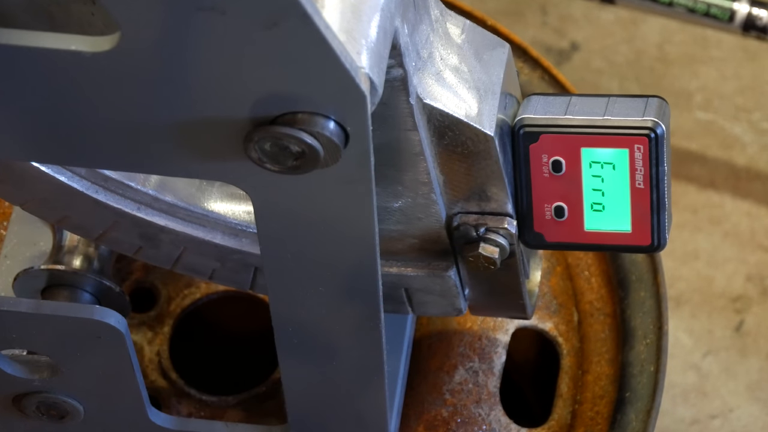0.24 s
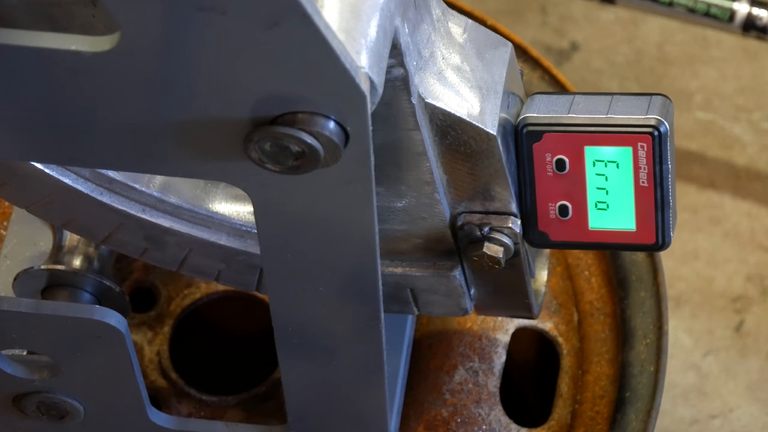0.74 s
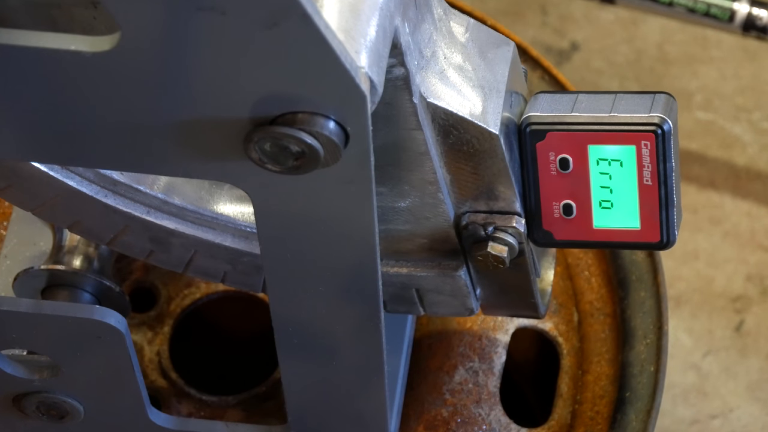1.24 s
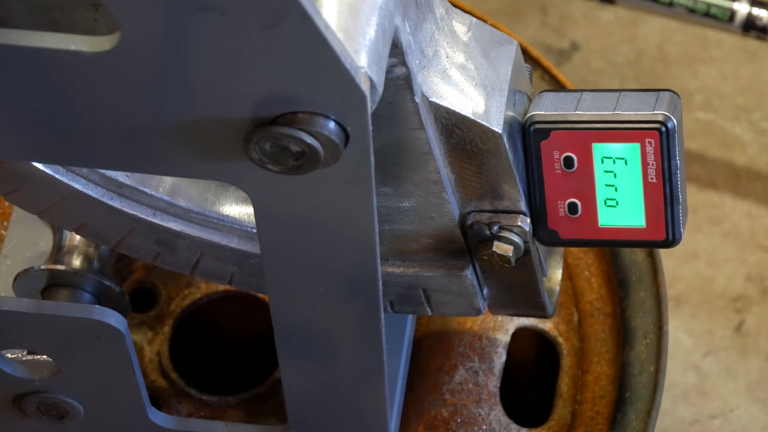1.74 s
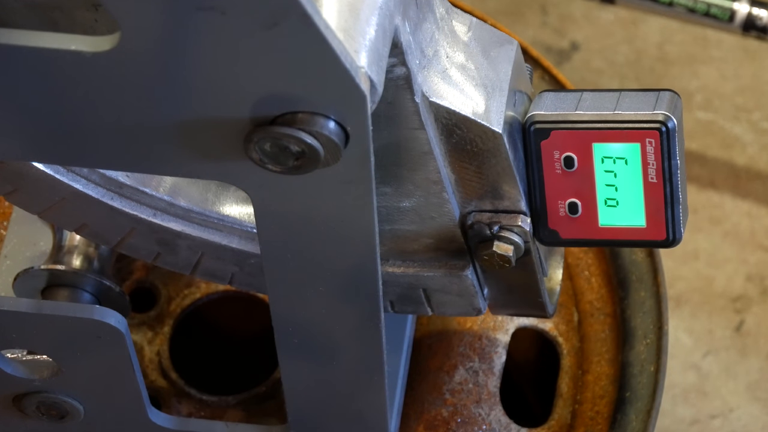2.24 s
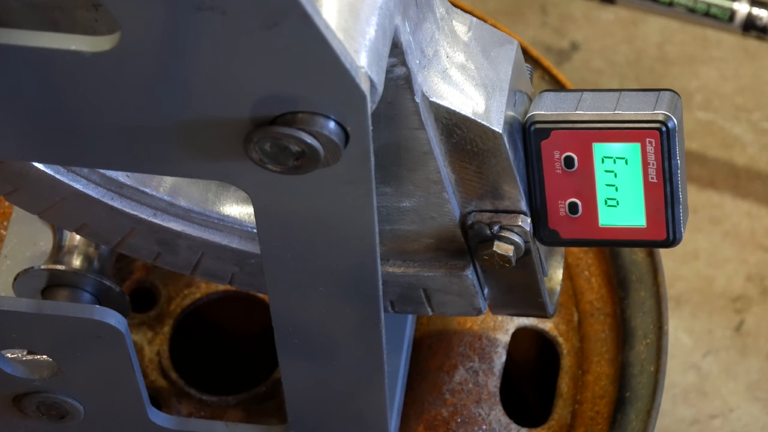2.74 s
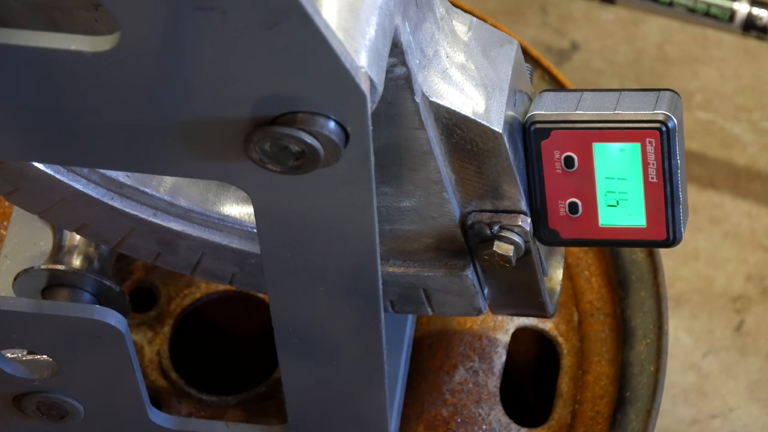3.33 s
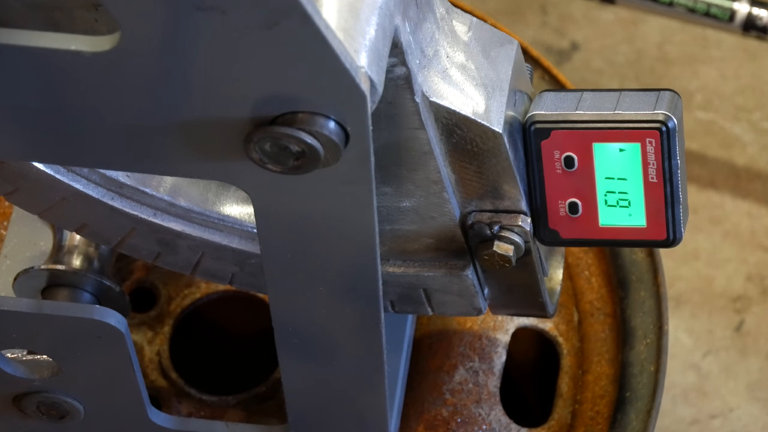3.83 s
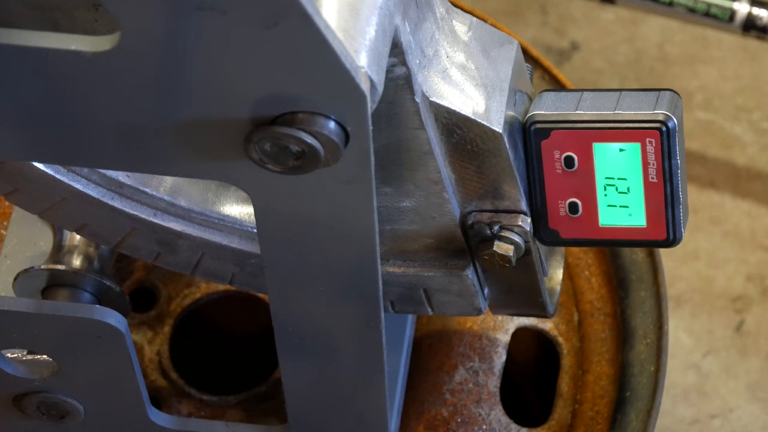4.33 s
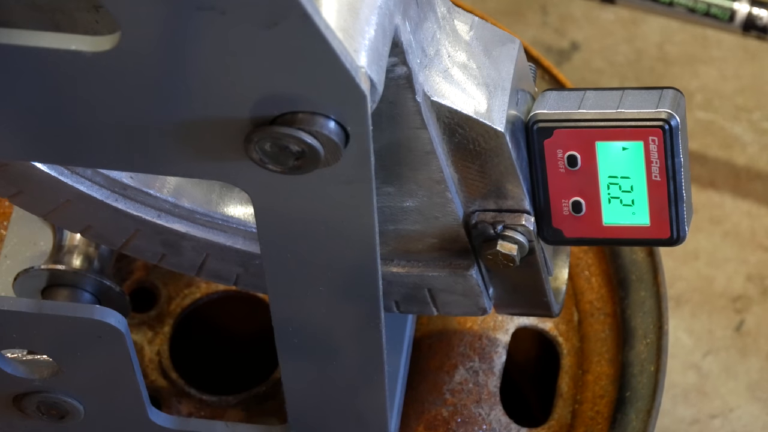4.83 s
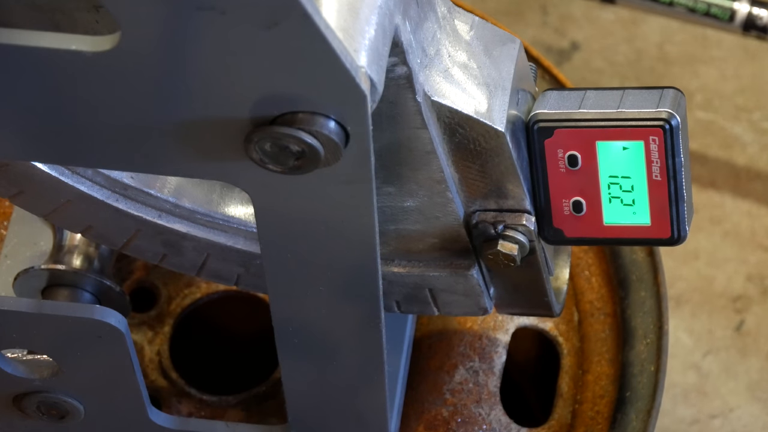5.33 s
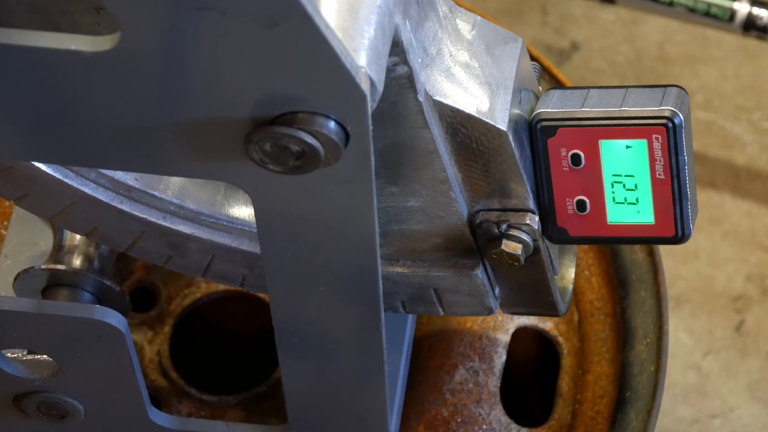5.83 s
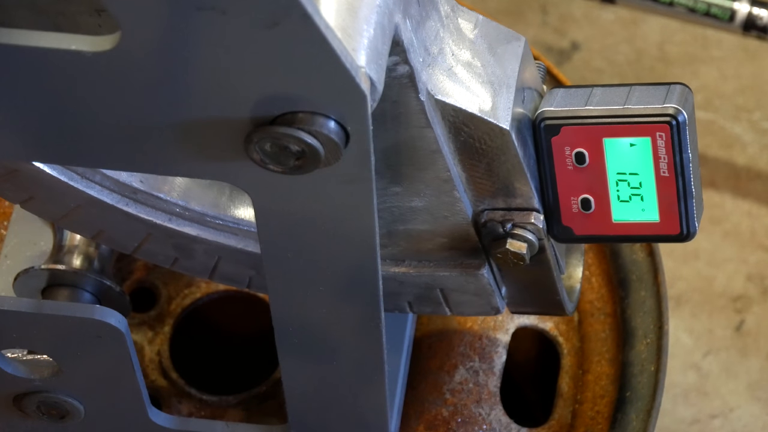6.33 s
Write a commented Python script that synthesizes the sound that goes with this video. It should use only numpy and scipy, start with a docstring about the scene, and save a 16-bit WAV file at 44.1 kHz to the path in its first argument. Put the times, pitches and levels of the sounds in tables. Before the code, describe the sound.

Close metallic clacks of a hand-pumped jack handle, three quick pump strokes, a near-silent pause of over two seconds, then slower strokes.

```python
"""A small workshop: a hydraulic jack on a steel tube bender is pumped by hand, with a pause half way.
Each push slams the loose handle home in its socket, each lift knocks and scrapes it back: filtered
contact pulses, stick-slip clicks and decaying modes. Link pins chink (noise ticks), the frame thuds.
A low gliding drone swells briefly over a faint rough hum and soft noise; the sound is close and nearly mono."""
import sys
import numpy as np
from scipy import signal
from scipy.fft import rfft, irfft
from scipy.io import wavfile

SR = 44100
rng = np.random.default_rng(int(sys.argv[2]) if len(sys.argv) > 2 else 0)


def to_wav(s):
    """Save 16-bit WAV."""
    ch = np.atleast_2d(s).T  # columns
    pcm = np.round(np.clip(ch, -1, 1) * 32767)  # PCM
    wavfile.write(sys.argv[1], SR, pcm.astype(np.int16))


N = 290178
LEAD_SAMPLES = SR // 4  # run-in, cut off in scene()
SLACK_RING_DB = -17.5  # handle ring while it slides through its play

# spectrum of a pin shifting in its hole: f/Hz, relative level/dB
PIN_SPECTRUM = [(500, -28.5), (3000, -12.5), (5000, -5), (8000, -11), (10200, -5), (11600, -1), (12800, 1),
                (14000, -9.5), (16000, -15)]


def undb(db):
    """Decibels to gain."""
    return 10 ** (np.asarray(db) / 20)


def unit(x):
    """Scale to an energy of one."""
    return x / np.sqrt(np.sum(x ** 2))


def along(table, hz):
    """Read a (f/Hz, value) table on a log-frequency axis."""
    f, value = np.transpose(table)
    return np.interp(np.log(np.maximum(hz, 1)), np.log(f), value)


def noise(t):
    """White noise as long as t."""
    return rng.standard_normal(len(t))


def fade(t, t60):
    """Exponential decay, 60 dB in t60 seconds."""
    return np.exp(-np.log(1000) * t / t60)


def walk(t, rate):
    """Smooth random drift with a spread near one: rate random points per unit of t, joined by lines."""
    points = rng.standard_normal(1024)
    return np.interp(t * rate, np.arange(len(points)), points)


def tap(spectrum, size=1024):
    """Minimum-phase pulse of unit energy with this spectrum, by folding the cepstrum."""
    log_gain = np.log(undb(along(spectrum, np.fft.rfftfreq(size, 1 / SR))))
    cepstrum = irfft(log_gain)
    cepstrum[1:size // 2] *= 2
    cepstrum[size // 2 + 1:] = 0
    return unit(irfft(np.exp(rfft(cepstrum))))


def through(x, response):
    """Filter x, keeping its length."""
    return signal.fftconvolve(x, response)[:len(x)]


def ring(modes, t, scatter_db=0.5, detune=0.0023):
    """Decaying modes; every blow lands elsewhere and shares them out anew."""
    chance = rng.standard_normal((len(modes), 2))
    total = np.zeros(len(t))
    for (hz, db, t60), (level_chance, pitch_chance) in zip(modes, chance):
        tone = np.sin(2 * np.pi * hz * (1 + detune * pitch_chance) * t)
        total += undb(db + scatter_db * level_chance) * fade(t, t60) * tone
    return unit(total)


def add(track, s, sound):
    """Mix in a sound at s seconds; the track begins LEAD_SAMPLES early."""
    start = LEAD_SAMPLES + int(s * SR)
    part = sound[:len(track) - start]
    track[start:start + len(part)] += part


def pump():
    """All the sounds of the pump strokes, close up, heard through the plates."""
    # pushes, timed by the knock that seats the handle: t/s, knock/dB, socket ring/dB, change per rebound/dB,
    # chink lead/s, chink/dB, first tap lead/s, tap/dB, share of upper frame modes/dB
    pushes = [(-.05, 8, -15.5, -16, 0.076, -6.5, 0.021, -4, 4.5),
              (0.4927, 6, -27, -6.5, 0.042, -23.5, 0.024, -8, 3),
              (1.0264, 4.5, -39, -4, 0.049, -8.5, 0.029, -8.5, -3),
              (4.8094, 6.5, -17, -7, 0.041, -16, 0.022, -11, -5.5),
              (5.5699, 5.5, -30, -7.5, 0.041, -20.5, 0.015, -13.5, -15.5),
              (6.2945, 5, -40, -8, 0.037, -11.5, .018, -11, -11)]
    # lifts, timed by the knock on the far side of the socket: t/s, knock/dB, treble setting/dB, touch lead/s,
    # touch/dB, scrape length/s, scrape/dB, handle ring/dB, chink delay/s, chink/dB, link ring/dB,
    # settling knock/dB, thud/dB, share of upper frame modes/dB
    lifts = [(0.2319, -2, -6.5, .027, -41.5, 0.018, -34.5, 0.5, 0.01, -20.5, -1, -3.5, -20.5, 0),
             (0.757, -2.5, -2.5, .019, -25, 0.022, -36, -1, .013, -17, -1, -12, -22, 0),
             (1.2735, -17, 6.5, 0.025, -20.5, 0.03, -37.5, -8, 0.014, -17, -0.5, -5, -24.5, 3.5),
             (3.951, -10.5, -30.5, .0072, -14.5, 0.041, -39.5, 6, 0.011, -18.5, 6.5, -15, -22, -3.5),
             (4.404, -13, -12, .019, -20.5, .036, -50, -1.5, .0255, -10.5, -20, -15.5, -24, 9.5),
             (5.148, -15, -8.5, 0.016, -18, 0.02, -42.5, -22, 0.009, -29.5, 7, -34, -20.5, -8),
             (5.929, -24, 3.5, .021, -16.5, 0.017, -41.5, -13, 0.015, -36, 6.5, -18.5, -22.5, -2.5)]
    track = np.zeros(LEAD_SAMPLES + N)
    t = np.arange(SR // 2) / SR
    gestures = [push(t, *row) for row in pushes] + [lift(t, *row) for row in lifts] + [rest(t)]
    for gesture in gestures:
        for s, sound in gesture:
            add(track, s, sound)
    return through(track, plates())


def push(t, s, db, socket_db, rebound_db, chink_lead_s, chink_db, tap_lead_s, tap_db, upper_db):
    """Down stroke as (s, sound): pins grind and chink, handle slides, taps twice, slams, rebounds; frame thuds."""
    slack_s, rebound_s = 0.05, 0.004  # slide through the play before seating; rebound spacing
    yield s - slack_s, undb(-42) * slide(t, slack_s, SLACK_RING_DB)
    yield s - slack_s, undb(-18.5) * grind(t)
    yield s - chink_lead_s, undb(chink_db) * chink(t, link_db=1)
    for lead_s in (tap_lead_s, tap_lead_s * 0.71):
        yield s - lead_s, knock(t, tap_db, treble_db=-20.5, socket_db=-7.5)
    for k in range(3):
        yield s + k * rebound_s, knock(t, db + k * rebound_db, treble_db=-23, socket_db=socket_db)
    yield s, undb(-18) * thud(t, frame_db=3.5, upper_db=upper_db)


def lift(t, s, db, treble_db, touch_lead_s, touch_db, scrape_s, scrape_db, handle_db,
         chink_delay_s, chink_db, link_db, settle_db, thud_db, upper_db):
    """Up stroke as (s, sound): handle slips, touches, grazes, knocks, scrapes and settles with a thud."""
    slack_s, slack_growth = .038, 2.6  # harder lifts rasp more in the play: dB per dB of the knock
    yield s - slack_s, undb(-41.5 + slack_growth * db) * slide(t, slack_s, SLACK_RING_DB)
    yield s - touch_lead_s, knock(t, touch_db, treble_db=-29.5, socket_db=-6)
    # the handle grazes on from the first touch
    yield s - touch_lead_s, undb(touch_db - 25) * slide(t, touch_lead_s, handle_db)
    yield s, knock(t, db, treble_db, socket_db=-12)
    yield s, undb(scrape_db) * slide(t, scrape_s, handle_db)
    yield s + chink_delay_s, undb(chink_db) * chink(t, link_db)
    yield s + scrape_s, knock(t, settle_db, treble_db=-13.5, socket_db=-12.5)
    # the frame rings more when the load bears on its upper modes
    frame_db = 2 + 0.83 * upper_db
    yield s + scrape_s, undb(thud_db) * thud(t, frame_db, upper_db)


def rest(t, socket_db=-14, handle_db=-18):
    """Resting handle as (s, sound): light ticks, shifts by the hand, and one soft thud under the load."""
    # light ticks of the handle: t/s, level/dB, treble setting/dB
    ticks = [(3.3473, -42, -12), (4.349, -33.5, -20)]
    # the hand shifts the handle: t/s, length/s, level/dB
    shifts = [(1.913, .012, -73), (2.4, .46, -85.5), (3.637, 0.17, -79.5)]
    for s, db, treble_db in ticks:
        yield s, knock(t, db, treble_db, socket_db)
    for s, length_s, db in shifts:
        yield s, undb(db) * slide(t, length_s, handle_db)
    yield 2, undb(-37) * thud(t, frame_db=-1.5, upper_db=-3.5)


def knock(t, force_db, treble_db, socket_db):
    """Steel on steel: one compact contact, a short chatter of the loose fit, socket and rim ring."""
    # contact spectrum: f/Hz, relative level/dB
    contact_spectrum = [(150, -46), (700, -31), (1100, -22), (1650, -11.5), (2300, -16.5), (3000, -7),
                        (3450, 2), (3950, -1), (4600, -18), (6000, -24), (7500, -29), (10000, -36.5),
                        (12600, -37.5), (16000, -48)]
    # socket modes: f/Hz, relative level/dB, t60/s
    socket_modes = [(1670, -7, 0.076), (1835, -14, 0.68), (2760, -15, 0.41), (3080, -4.5, 0.19),
                    (3320, -3, 0.37), (3790, -0.5, 0.19), (3750, 4.5, .28), (3780, -4.5, 0.3),
                    (4050, -2.5, .25), (4200, -12, .26), (7220, -21, .12), (12480, -19.5, .1)]
    # socket rim modes: f/Hz, relative level/dB, t60/s
    rim_modes = [(4410, -2, .04), (5480, 0.5, 0.037), (5980, -3.5, 0.059), (7700, -11.5, .035)]
    # sharper contacts lift everything above the socket's main resonance and set its rim ringing
    treble_lift_db = .75 * (treble_db + 26.5)
    spectrum = [(hz, db + treble_lift_db * (hz > 4300)) for hz, db in contact_spectrum]
    rim_db = np.interp(treble_db, [-25, -8], [-26, -4])
    rim = undb(rim_db) * ring(rim_modes, t, scatter_db=8.5, detune=.015)
    chatter = unit(noise(t) * fade(t, 0.055) * (1 - fade(t, 0.002)))
    # a hard blow seats the handle at once, a light one lets it rattle
    chatter_db = np.interp(force_db, [-14.5, 5.5], [-1, -9])
    blow = signal.unit_impulse(len(t)) + undb(chatter_db) * chatter
    contact = disperse(through(blow, spot(spectrum)))
    return undb(force_db) * (contact + rim + undb(socket_db) * ring(socket_modes, t))


def slide(t, length_s, handle_db):
    """Stick and slip: dense uneven clicks; the handle's ring builds up as long as they last."""
    # rub spectrum: f/Hz, relative level/dB
    rub_spectrum = [(150, 3.5), (700, -6), (1700, 0.5), (2400, 4.5), (3400, 8), (4600, -5), (5700, -9),
                    (7500, -14), (12000, -16.5), (16000, -22.5)]
    # handle modes: f/Hz, relative level/dB, t60/s
    handle_modes = [(1893, -15, .26), (3120, -4.5, 0.61), (3105, -0.5, 0.22), (3080, -1, 0.12),
                    (5410, -12.5, 0.18), (7280, -23, .1)]
    after_s = np.maximum(t - length_s, 0)
    pressure = (1 - fade(t, 0.11)) * fade(after_s, 0.11)
    rasp = np.zeros(len(t))
    for _ in range(3):  # points of the handle that rub at once
        clicks = (rng.random(len(t)) < 380 / SR) * noise(t)  # about 380 per second
        rasp += through(clicks * pressure, spot(rub_spectrum))
    # the ring falls back as the handle comes to rest in the socket
    swell = np.minimum(t / length_s, 1) ** .5 * (1 + 3.2 * fade(after_s, 0.066))
    singing = unit(swell * ring(handle_modes, t))
    return (unit(rasp) + undb(handle_db) * singing) * np.sqrt(length_s * SR)


def chink(t, link_db):
    """A pin shifts in its hole: a bright tick and the ring of the small link."""
    # link modes: f/Hz, relative level/dB, t60/s
    link_modes = [(6330, 0.5, 0.18), (9080, -14.5, 0.21), (11170, 4, 0.073), (11563, -4, 0.17),
                  (12050, -6, 0.021)]
    contact = noise(t) * fade(t, .009) * (1 - fade(t, .008)) ** 2
    tick = unit(through(contact, spot(PIN_SPECTRUM)))
    return tick + undb(link_db) * ring(link_modes, t) * (1 - fade(t, .015))


def grind(t):
    """The pins turn in their holes: a bright rub that swells softly and dies away."""
    rub = noise(t) * fade(t, .13) * (1 - fade(t, .06)) ** 2
    return unit(through(rub, spot(PIN_SPECTRUM)))


def thud(t, frame_db, upper_db):
    """The heavy frame rocks: a soft push and its low modes, shared out by where the load bears."""
    # spectrum of the push: f/Hz, relative level/dB
    thud_spectrum = [(40, -50), (100, -20.5), (150, 4), (300, -6.5), (420, 1), (600, -9.5), (1200, -13.5),
                     (4000, -47)]
    # frame modes: f/Hz, relative level/dB, t60/s
    frame_modes = [(132, -15.5, 0.16), (190, -21, 0.24), (228.3, -1.5, 0.38), (268, 8, 0.24),
                   (361, 2.5, 0.46), (472, -12, .3)]
    swell = noise(t) * fade(t, 0.21) * (1 - fade(t, 0.038))
    soft_push = unit(through(swell, tap(thud_spectrum)))
    modes = [(hz, db + upper_db * (hz > 300), t60) for hz, db, t60 in frame_modes]
    return soft_push + undb(frame_db) * ring(modes, t)


def spot(spectrum):
    """Pulse of one contact: each lands on another spot, which colours its treble differently."""
    hz = np.linspace(100, SR / 2, 220)
    ripple_db = np.interp(hz, [3000, 6000], [1, 4]) * walk(hz, 1 / 420)  # a random point every 420 Hz
    return tap(np.column_stack([hz, along(spectrum, hz) + ripple_db]))


def disperse(x, hz=3700, sharpness=2.5):
    """All-pass: the socket holds back waves near its resonance, so a contact swells for half a millisecond."""
    poles = signal.iirpeak(hz, sharpness, fs=SR)[1]
    return signal.lfilter(poles[::-1], poles, x)


def plates():
    """Response of the steel plates: each resonance lifts its band and rings on for a few milliseconds."""
    # plate resonances: f/Hz, width/Hz, lift/dB
    resonances = [(1750, 450, 2), (3660, 300, 4), (4450, 400, 3), (5450, 600, 4), (6272, 110, 7),
                  (7330, 220, 10), (8050, 160, 5), (9080, 140, 9), (9460, 140, 7), (10350, 200, 4),
                  (11200, 300, 5), (11850, 260, 6), (12580, 280, 8), (13600, 380, 6)]
    hz = np.linspace(1, SR / 2, 2048)
    lift_db = sum(db / (1 + (2 * (hz - centre_hz) / width_hz) ** 2) for centre_hz, width_hz, db in resonances)
    return tap(np.column_stack([hz, lift_db]), size=4096)


def workshop(t):
    """Diffuse echo of the walls: it builds up in a few milliseconds, each octave dies at its own rate."""
    # reverberation: f/Hz, t60/s
    room_t60 = [(150, 0.64), (400, 0.99), (1200, 0.54), (3500, 0.54), (7000, 0.47), (14000, .3)]
    spectrum = rfft(noise(t))
    hz = np.fft.rfftfreq(len(t), 1 / SR)
    octave = np.round(np.log2(np.maximum(hz, 64)))
    tail = np.zeros(len(t))
    for k in np.unique(octave):
        tail += irfft(spectrum * (octave == k), len(t)) * fade(t, along(room_t60, 2 ** k))
    return unit(tail * (1 - fade(t, 0.017)))


def drone(t, second_db=-17, third_db=-19):
    """A low tone with two overtones: its pitch glides while it swells and sinks away."""
    # glide: t/s, f/Hz, level before the mix/dB
    glide = [(4.3, 81, -73), (4.49, 80.5, -64), (4.976, 84.2, -58), (5.092, 83.9, -61), (5.618, 87, -63),
             (5.72, 84.6, -59), (5.9, 80, -83)]
    s, hz, db = np.transpose(glide)
    phase = 2 * np.pi * np.cumsum(np.interp(t, s, hz)) / SR
    size = np.interp(t, [s[0] - .2, *s, s[-1] + .2], [0, *undb(db), 0])
    tone = np.sin(phase) + undb(second_db) * np.sin(2 * phase) + undb(third_db) * np.sin(3 * phase)
    return np.sqrt(2) * size * tone


def hum(t, drift_hz=6.6, waver_db=2):
    """Faint tones of a running machine, slightly rough as pitch and level drift at random."""
    # tones: f/Hz, level before the mix/dB
    tones = [(80.7, -77), (129.2, -74.5), (253.0, -78.5), (635.2, -85.5), (759.0, -86), (1200, -87),
             (1561, -89.5)]
    total = np.zeros(len(t))
    for hz, db in tones:
        size = undb(db + waver_db * walk(t, 3.1))
        phase = 2 * np.pi * np.cumsum(hz + drift_hz * walk(t, 30)) / SR
        total += size * np.sqrt(2) * np.sin(phase)
    return total


def air(t):
    """Quiet background noise: white noise shaped by a falling spectrum."""
    # noise spectrum: f/Hz, relative level/dB
    air_spectrum = [(12, -49.5), (20, -17.5), (49, 0.5), (130, -4), (255, -12), (399, -15), (624, -19.5),
                    (678, -21.5), (1220, -25), (1400, -26.5), (1530, -29.5), (1910, -27), (14300, -36.5),
                    (16000, -39)]
    return undb(-70.5) * through(noise(t), tap(air_spectrum, size=8192))


def scene():
    """Nearly mono: a faint diffuse wash and a little noise differ between left and right."""
    # spectrum of the faint left-right difference that follows the strokes: f/Hz, relative level/dB
    side_spectrum = [(150, -6.5), (600, 8.5), (1500, 5), (3500, -4.5), (8000, 13.5), (14000, 10)]
    t = np.arange(N) / SR
    jack = pump()
    echo, wash = (through(jack, workshop(t[:SR]))[LEAD_SAMPLES:] for _ in range(2))
    mid = jack[LEAD_SAMPLES:] + undb(-12.5) * echo
    mid += undb(1.0) * air(t) + undb(-1) * hum(t) + undb(0.5) * drone(t)
    side = undb(-28) * through(wash, tap(side_spectrum)) + undb(-11.5) * air(t)
    return np.array([mid + side, mid - side])


def record(dry):
    """The recorder cuts the top: steep elliptic low-pass at 15.7 kHz."""
    low_pass = signal.ellip(8, .2, 70, 15700, fs=SR, output="sos")
    return signal.sosfilt(low_pass, dry)


dry = scene()
out = record(dry)
to_wav(out)
```